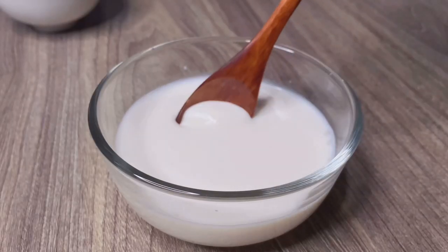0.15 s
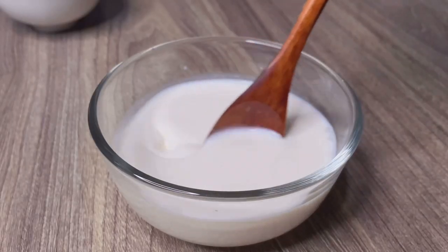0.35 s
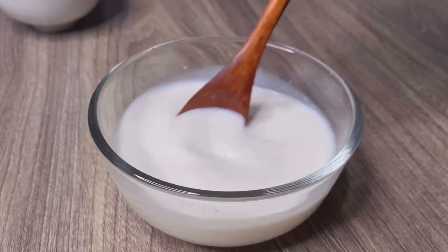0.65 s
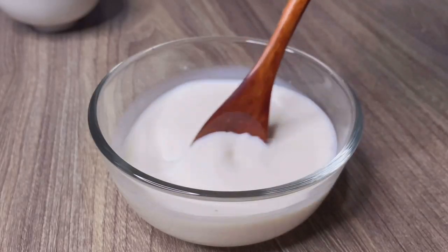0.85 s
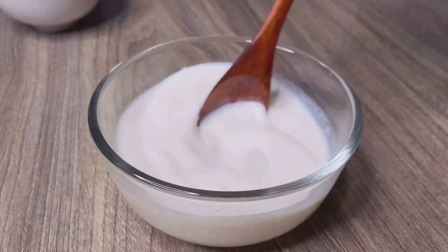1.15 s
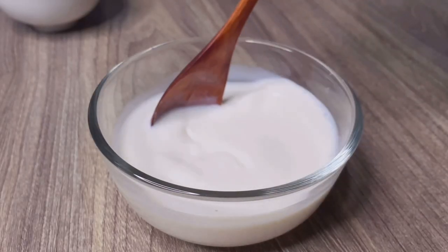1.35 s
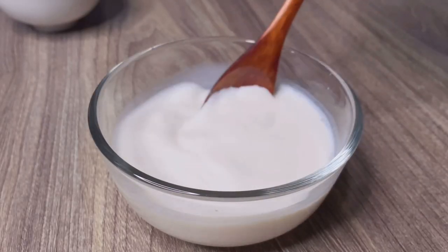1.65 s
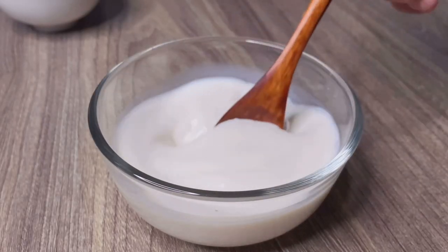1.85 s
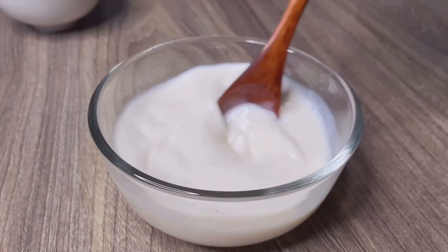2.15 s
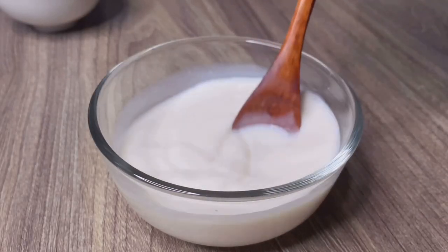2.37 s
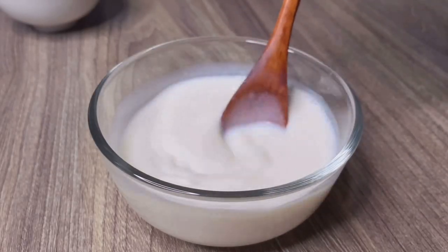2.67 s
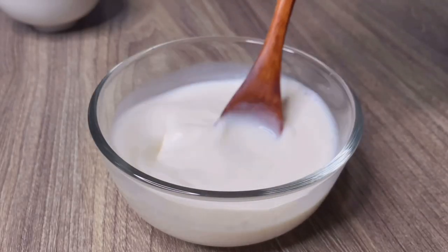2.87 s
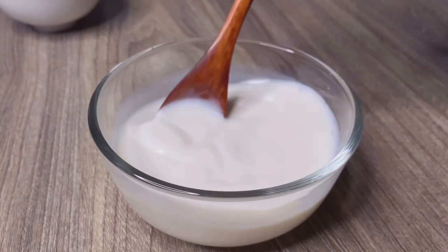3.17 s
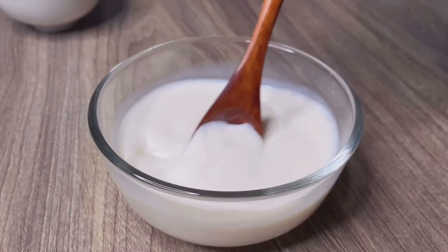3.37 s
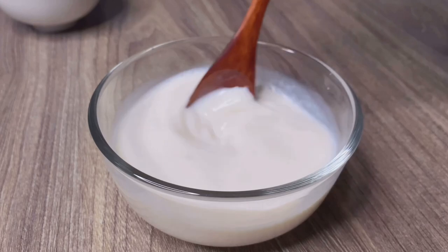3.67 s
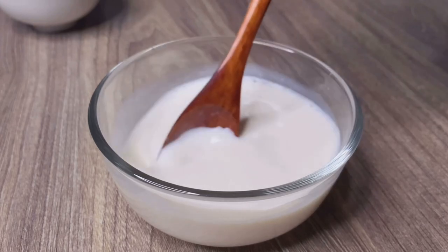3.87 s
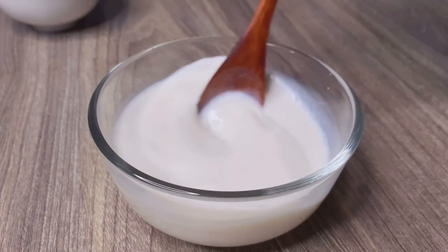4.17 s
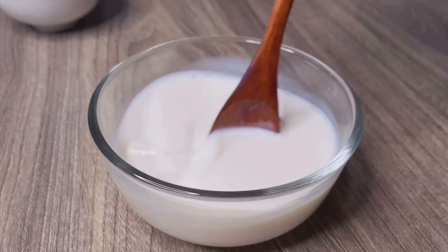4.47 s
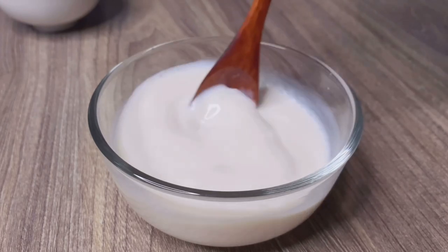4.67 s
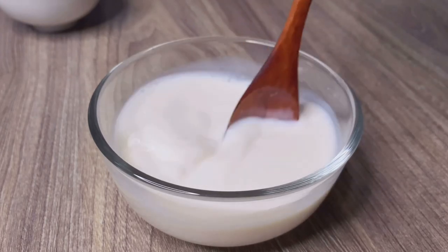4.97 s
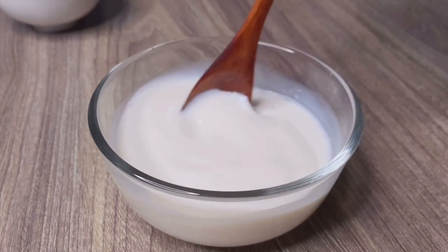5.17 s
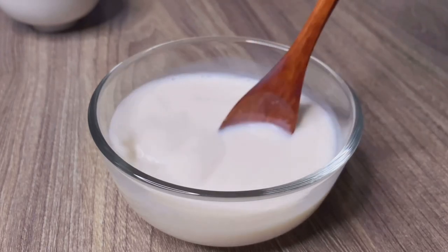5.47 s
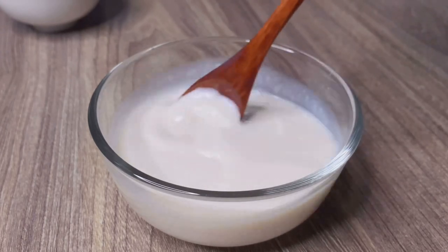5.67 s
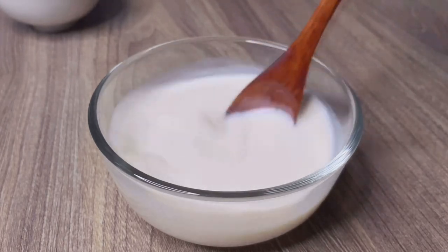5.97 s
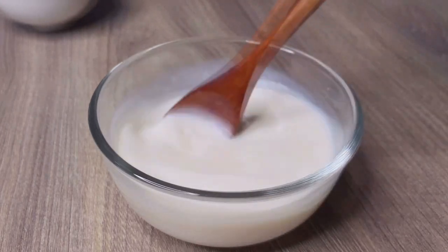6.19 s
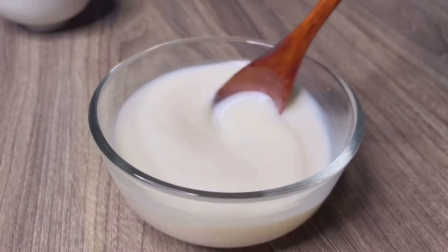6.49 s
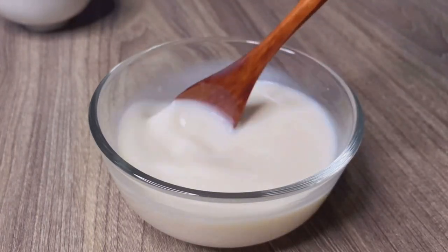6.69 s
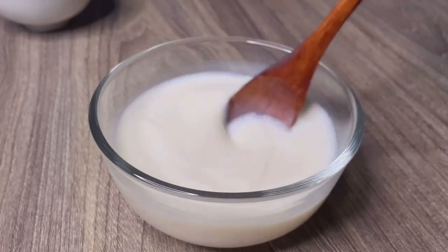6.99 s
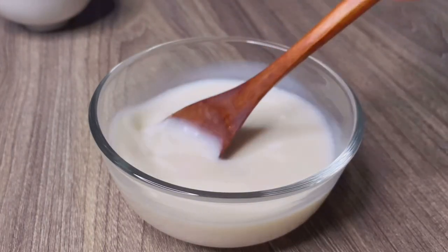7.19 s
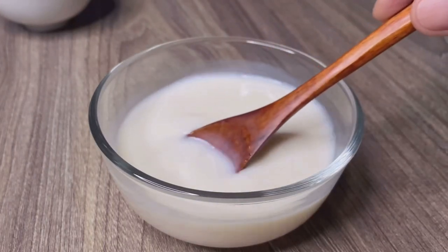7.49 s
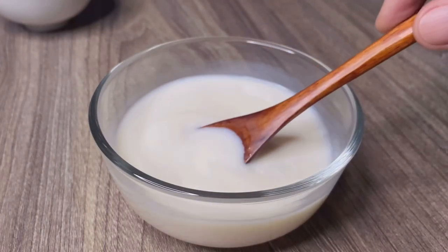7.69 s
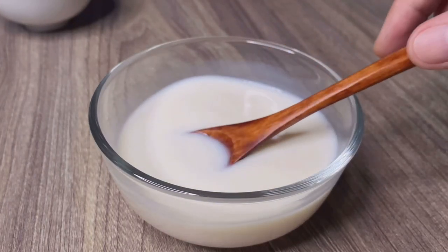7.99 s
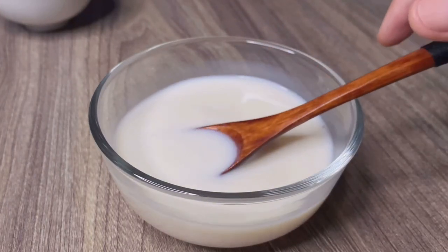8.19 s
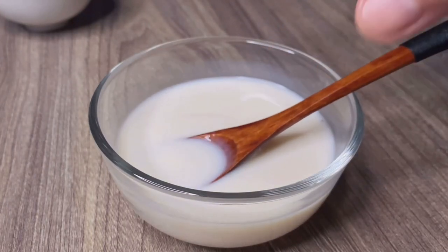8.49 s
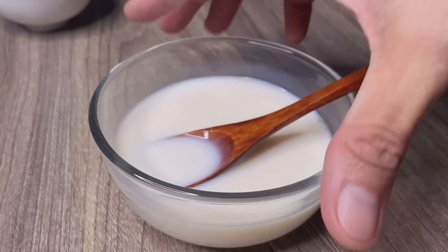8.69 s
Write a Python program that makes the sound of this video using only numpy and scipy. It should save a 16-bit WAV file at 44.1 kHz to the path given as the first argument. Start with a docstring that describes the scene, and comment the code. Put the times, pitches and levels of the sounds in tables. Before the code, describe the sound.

A wooden spoon stirs thick liquid in a glass bowl, scraping, ticking and knocking the wall, then its handle clatters onto the rim.

```python
"""A wooden kitchen table: a wooden spoon stirs a thick liquid in a glass bowl, picked up by two microphone ports.
Its edge scrapes (noise bands and table drone) and ticks (short bursts and notes) along the glass; it bumps the
wall (pushes through table resonances, ringing glass modes), and at last the handle drops on the rim and clatters.
Gurgle blips follow the drone, and a hand brushes the bowl at the end.
Underneath: a resonant room rumble, a pulsing whir, a faint hiss. The left port is a little nearer to the bowl."""
import sys
import numpy as np
from scipy import signal
from scipy.fft import rfft, irfft, next_fast_len
from scipy.io import wavfile
from scipy.ndimage import uniform_filter1d, map_coordinates

SR = 44100
rng = np.random.default_rng(int(sys.argv[2]) if len(sys.argv) > 2 else 0)


def file_out(sig):
    """Save sig as 16-bit WAV at sys.argv[1]."""
    # one column per channel
    cols = np.atleast_2d(sig).T
    # limit, then scale
    lim = np.clip(cols, -1, 1)
    pcm = np.round(lim * 32767).astype(np.int16)
    wavfile.write(sys.argv[1], SR, pcm)


N = 389844
TIME_S = np.arange(N) / SR

# Room levels. Each row: time in seconds, rumble level in dB, whir level in dB.
ROOM_LEVELS = [(0.0, -70, -70.5), (0.47, -71.5, -70.5), (0.83, -62, -74), (2.75, -58, -71),
               (4.33, -53.5, -66.5), (7.7, -54, -67), (8.84, -55.5, -66.5)]
# Rumble resonances. Each row: centre in Hz, width in Hz, relative level in dB.
RUMBLE_MODES = [(50.8, 29, -9.5), (96, 10.9, -0.5), (152.6, 15, -6), (282, 33.5, -14.5), (548, 110, -30)]
# Whir spectrum. Each row: frequency in Hz, relative density in dB per Hz.
WHIR_SPECTRUM = [(1800, -16), (2000, -1.5), (2250, 3), (2450, -0.5), (2600, -38)]
# Room hiss spectrum. Each row: frequency in Hz, relative density in dB per Hz.
HISS_SPECTRUM = [(300, -18.5), (1200, -12.5), (3000, -20), (6500, -22), (11000, -30), (12000, -52)]
# Left-right likeness of the room noise. Each row: frequency in Hz, correlation from 0 to 1.
ROOM_LIKENESS = [(70, 0.88), (130, 0.94), (290, 0.8), (640, 0)]
# Decay of the walls' answer. Each row: frequency in Hz, t60 in seconds.
WALL_T60 = [(200, 0.65), (2000, 0.13), (12000, 0.13)]
# Port difference for sound from the bowl. Each row: frequency in Hz, left lead in radians, left over right in dB.
PORT_DIFFERENCE = [(0, 1, 1), (390, 0.73, -1.5), (990, 2.5, 3.5), (2140, 2, 5), (3590, 4.5, 8.5),
                   (5800, 4.5, 0), (6980, 8.5, 2), (11630, -3.5, -2), (13860, -6, 1.5), (16900, -17, -3.5)]
# Band cancelled by the table's reflection. Each row: centre in Hz, width in Hz, level in dB.
TABLE_DIP = [(2600, 1280, -7.5)]
# Table resonances. Each row: centre in Hz, width in Hz, level in dB.
TABLE_MODES = [(150, 45, 2), (255, 101, 6.5), (380.7, 34.2, 14), (571, 72, -3)]
# Spoon resonances. Each row: centre in Hz, width in Hz, level in dB.
SPOON_MODES = [(3410, 1520, 0.5), (6450, 900, -0.5), (7166, 420, 1.5), (9310, 780, 0), (11010, 1220, -5.5),
               (14670, 1070, -11)]
# Handle resonances. Each row: centre in Hz, width in Hz, level in dB.
CLATTER_MODES = [(207, 34, 4), (384, 120, -7), (575, 75, -1.5), (1380, 187, 0), (3060, 150, -0.5),
                 (4400, 1800, -16), (6800, 4100, -23.5), (9400, 200, -17)]
# Glass modes. Each row: pitch in Hz, undamped t60 in seconds, left lead in radians, left over right in dB.
GLASS_MODES = [(1410, .95, .8, 2.5), (3381, .45, -1.2, -4), (5922, .25, .6, 14)]
# Blows under the liquid, lowest mode. Each row: start in seconds, level in dB, free ringing in seconds.
BLOWS_LOW_MODE = [(0.639, -55, 0.27), (1.0766, -60, 0.08), (2.059, -62, 0.16), (2.24, -63.5, 0.3),
                  (2.9282, -63, 0.18), (3.273, -60.5, 0.11), (3.701, -59, 0.32), (3.8167, -53, 0.18),
                  (4.172, -63, 0.19), (4.96, -58, 0.11), (5.1125, -56.5, 0.26), (5.5448, -61, 0.19),
                  (5.611, -53.5, 0.16), (6.116, -64, 0.47), (6.5073, -48, 0.17), (6.7998, -73, 0.15),
                  (6.993, -49, 0.43), (7.7787, -67.5, 0.14)]
# Touches high on the wall, second mode. Each row: start in seconds, level in dB, free ringing in seconds.
CHIMES_SECOND_MODE = [(.502, -60, .06), (2.002, -59, 0.057), (2.349, -56, .1)]
# Handle on the rim. Each row: start in seconds, then level in dB and free ringing in seconds for each glass mode.
RIM_STRIKES = [(8.042, -36.5, 0.058, -43, 0.082, -51.5, 0.067), (8.061, -43, 0.17, -52, 0.14, -80, .04),
               (8.264, -29, 0.033, -35, 0.31, -38.5, 0.067), (8.298, -61, 0.041, -52.5, 0.28, -74, 0.05)]
# Spoon or hand bumping the bowl. Each row: start in seconds, level in dB, pitch in Hz.
BOWL_BUMPS = [(0.507, -47.5, 382), (0.624, -35.5, 362), (1.04, -38, 347), (1.678, -44.5, 338),
              (1.791, -49, 254), (2.036, -36.5, 296), (2.382, -37.5, 375), (2.448, -40.5, 296),
              (2.563, -40, 382), (2.703, -47.5, 328), (2.779, -45, 391), (2.831, -40.5, 400),
              (3.097, -35.5, 290), (3.189, -36, 376), (3.304, -41, 272), (3.505, -38, 349),
              (3.61, -41.5, 383), (3.686, -38.5, 371), (3.803, -37.5, 375), (3.918, -40.5, 379),
              (4.188, -34.5, 358), (4.208, -39, 387), (4.288, -38, 377), (4.335, -42.5, 381),
              (4.459, -37, 399), (4.543, -39.5, 348), (4.849, -38.5, 384), (4.9, -34.5, 402),
              (4.957, -43, 392), (5.097, -39, 387), (5.31, -35.5, 377.5), (5.621, -35, 372),
              (5.662, -44, 366), (6.002, -38, 378.5), (6.07, -38.5, 351), (6.113, -37.5, 390),
              (6.202, -44, 379), (6.505, -28, 396), (6.987, -25, 372.6), (7.1, -37.5, 266),
              (7.781, -38, 266), (8.045, -42, 212), (8.061, -33, 222), (8.259, -35, 377),
              (8.307, -35.5, 235)]
# Edge catching on the glass. Each row: start in seconds, blade note level in dB, crack level in dB.
EDGE_TICKS = [(0.0909, -29, -41.5), (0.17, -40, -52), (0.501, -46, -45.5), (0.5606, -55, -53),
              (0.618, -25, -32.5), (0.6401, -39, -33.5), (1.0397, -24.5, -44), (1.061, -20, -40),
              (1.4552, -37, -43.5), (1.529, -32.5, -56), (1.6654, -47, -40.5), (1.8607, -58, -53.5),
              (2.001, -29.5, -71), (2.0542, -43, -48.5), (2.3576, -44, -47.5), (2.4568, -48, -53),
              (2.4997, -32.5, -55), (2.927, -31.5, -52), (3.0485, -38, -50), (3.0818, -41, -41),
              (3.268, -49, -42.5), (3.3057, -69, -47), (3.5011, -38, -51.5), (3.6792, -19, -43),
              (3.695, -20, -44), (3.7082, -41, -38.5), (3.796, -45, -39), (3.8098, -54, -38),
              (3.9343, -24.5, -47), (4.009, -24.5, -45), (4.0535, -41, -48.5), (4.153, -28.5, -46),
              (4.1945, -20, -37), (4.2286, -24.5, -51), (4.288, -30, -42.5), (4.3257, -33, -42),
              (4.3947, -34, -49.5), (4.513, -29, -48), (4.6663, -29.5, -49), (4.878, -33.5, -56),
              (4.9, -21.5, -41.5), (4.918, -17, -35.5), (5.094, -14.5, -32.5), (5.1555, -26, -39.5),
              (5.497, -24.5, -46), (5.543, -26.5, -48), (5.6036, -22, -32.5), (5.6142, -22, -37),
              (5.63, -43, -30.5), (5.7359, -55, -38), (5.853, -27, -59), (5.8734, -24, -47.5),
              (5.9256, -47, -41.5), (6.0007, -32, -46.5), (6.0367, -40, -43.5), (6.0662, -20.5, -44.5),
              (6.136, -51, -47), (6.2045, -45, -54), (6.324, -24, -45.5), (6.5023, -28, -58),
              (6.5569, -24, -42.5), (6.7789, -62, -52), (6.984, -24, -45.5), (7.0403, -27.5, -42.5),
              (7.1135, -43, -49.5)]
# Spoon pressing on the glass. Each row: start in seconds, hold in seconds, blade note in Hz,
# rasp level in dB, wet hiss level in dB, table drone level in dB.
SCRAPE_STROKES = [(0.049, 0.094, 3830, -68, -56.5, -64), (0.431, 0.14, 3680, -67, -63, -64.5),
                  (0.615, 0.041, 3800, -64, -51.5, -49.5), (1.033, 0.044, 3920, -55, -62, -57),
                  (1.221, 0.1, 4020, -55, -63, -74), (1.44, 0.083, 4086, -58, -61.5, -59.5),
                  (1.649, 0.021, 3784, -61, -68, -73), (2.001, 0.04, 3655, -63, -59.5, -57.5),
                  (2.345, 0.13, 3500, -81, -68.5, -54.5), (2.791, 0.096, 3700, -63, -68, -52.5),
                  (3.056, 0.035, 3870, -51, -53, -50.5), (3.674, 0.045, 3930, -58, -65, -52),
                  (3.795, 0.037, 3800, -74, -53, -49), (3.92, 0.083, 3685, -54.5, -63, -50),
                  (4.151, 0.097, 3870, -55, -53.5, -49.5), (4.4, 0.12, 3710, -58.5, -65.5, -55.5),
                  (4.621, 0.18, 3933, -63, -58, -58.5), (4.872, 0.11, 3807, -50, -53, -48),
                  (5.091, 0.09, 3934, -50.5, -52.5, -52), (5.482, 0.069, 3750, -62, -53.5, -56),
                  (5.601, 0.05, 3690, -72, -52, -48.5), (5.78, 0.14, 3820, -57, -58.5, -52),
                  (5.998, 0.11, 3703, -71, -59, -58.5), (6.301, 0.015, 3830, -58, -65, -66),
                  (6.502, 0.13, 3696, -61, -65, -55.5), (6.982, 0.11, 3754, -60.5, -61, -50.5),
                  (7.219, 0.022, 3550, -67, -92, -58)]
# Fade after a scrape: rasp, wet hiss and drone in dB per second.
RELEASE_DB_PER_S = [182, 117, 128]
# Light contact between scrapes. Each row: time in seconds, base level in dB.
GLIDE_BASE = [(0, -72), (2.7, -68), (3.9, -65), (6.1, -63.5), (6.45, -81), (7.2, -102)]
# Rasp, wet hiss and drone over the glide's base level, in dB.
GLIDE_OFFSET_DB = [-3, 4, 1.5]

TOP_HZ = 16500
GRIP_S, GRIP_DB, GRIP_HZ = 8.815, -47.5, 895
GRAB_DB_PER_S = 703  # onset slope of scrapes and grip
CRACK_DRIVE_DB, PUSH_DRIVE_DB = 24, 6  # added ahead of the spoon and table resonances
SOFT_DB, BRIGHTER_DB_PER_DB = -41, 0.7  # above SOFT_DB a bump's knock gains this much extra
GURGLES_PER_S, GURGLE_HZ, GURGLE_DB = 70, 949.5, -10  # rate, middle pitch, level over the drone


def amp(db):
    """dB to amplitude."""
    return 10 ** (np.asarray(db) / 20)


def unit(x):
    """Scales to rms 1."""
    return x / np.sqrt(np.mean(x ** 2) + 1e-20)


def along(points, hz):
    """Interpolates (Hz, value) points on a log axis."""
    f, v = np.transpose(points)
    return np.interp(np.log(hz + 1), np.log(f + 1), v)


def shape(points):
    """A gain by frequency, shut well outside its points."""
    def gain(hz):
        inside = (hz > .7 * points[0][0]) * (hz < 1.1 * points[-1][0])
        return amp(along(points, hz)) * inside
    return gain


def curves(rows):
    """One value per sample per column; -120 dB past a last row over 1 s before the end."""
    s, *cols = np.transpose(rows)
    after_db = -120 if s[-1] < TIME_S[-1] - 1 else None
    return [np.interp(TIME_S, s, c, right=after_db) for c in cols]


def wobble(knots_per_s):
    """A smooth random curve."""
    knots = rng.standard_normal(int(N * knots_per_s / SR) + 4)
    return map_coordinates(knots, [TIME_S * knots_per_s])


def filtered(x, response):
    """x times a complex response of frequency."""
    m = next_fast_len(N + SR // 2)
    return irfft(rfft(x, m) * response(np.fft.rfftfreq(m, 1 / SR)), m)[..., :N]


def body(modes):
    """The causal response of a set of resonances, alternating in sign."""
    def response(f):
        return sum((-1) ** k * amp(db) * 1j * f * w / (c * c - f * f + 1j * f * w)
                   for k, (c, w, db) in enumerate(modes))
    return response


def add(track, s, sound):
    """Lays a short sound on the track at s seconds."""
    part = track[max(round(s * SR), 0):][:len(sound)]
    part += sound[:len(part)]


def ring(t, hz, t60_s, attack_s):
    """A dying sine with a soft start."""
    return np.sin(2 * np.pi * hz * t) * amp(-60 * t / t60_s) * (1 - np.exp(-t / attack_s))


def patchy(x, depth_db):
    """Random gain in patches of time and frequency."""
    z = signal.stft(x, nperseg=256)[2]
    field = uniform_filter1d(rng.standard_normal(z.shape), size=6, axis=0)
    field = uniform_filter1d(field, size=5, axis=1)
    return signal.istft(z * amp(depth_db * unit(field)), nperseg=256)[1][:N]


def diffuse(response):
    """Stereo noise of rms 1; mid and side shares set the left-right likeness by frequency."""
    def mid_side(hz):
        turn = np.arccos(np.clip(along(ROOM_LIKENESS, hz), -1, 1)) / 2
        return response(hz) * [np.cos(turn), np.sin(turn)]
    mid, side = filtered(rng.standard_normal((2, N)), mid_side)
    return unit(np.array([mid + side, mid - side]))


def room_tone():
    """A low rumble in the room's resonances, a whir that pulses fast, a faint hiss."""
    rumble_db, whir_db = curves(ROOM_LEVELS)
    swell = amp(1.5 * wobble(7))
    rumble = swell * diffuse(
        lambda f: body(RUMBLE_MODES)(f) / (1 + (35 / (f + 1)) ** 4) / (1 + (f / 900) ** 4))
    rumble = amp(rumble_db) * rumble * amp([[-1.1], [1.1]])  # right port stronger
    whir = amp(whir_db) * unit(amp(2.0 * wobble(90)) * diffuse(shape(WHIR_SPECTRUM)))
    hiss = amp(whir_db - 7.0) * diffuse(shape(HISS_SPECTRUM))
    return rumble + whir + hiss


def kitchen(x):
    """The walls' answer: delayed noise whose frequencies die at their own speeds."""
    hz, t, z = signal.stft(rng.standard_normal((2, SR // 3)), SR, nperseg=256)
    decay = amp(-60 * t / along(WALL_T60, hz)[:, None])
    tail = signal.istft(z * decay, SR, nperseg=256)[1]
    delayed = np.pad(x, (150, 0))[None]  # samples
    return signal.fftconvolve(delayed, tail / np.linalg.norm(tail[0]), axes=1)[:, :N]


def ports(x, lead_rad, left_db):
    """Phase and level differences by frequency, half on each side."""
    def response(hz):
        half = np.exp(.5j * lead_rad(hz)) * amp(left_db(hz) / 2)
        return np.array([half, 1 / half])
    return filtered(np.array([x, x]), response)


def shifting(pair, radians):
    """The circling spoon's path to each port keeps changing: slow random phase, less in the bass."""
    hz, _, z = signal.stft(pair, SR, nperseg=256)
    field = uniform_filter1d(rng.standard_normal(z.shape), size=8, axis=1)
    field = uniform_filter1d(field, size=60, axis=2)
    turn = radians * unit(field) * (hz / (hz + 500))[:, None]
    return signal.istft(z * np.exp(1j * turn), nperseg=256)[1][:, :N]


def grip():
    """Skin on glass as the hand takes hold: a dull noise brush that swells in."""
    skin = body([(GRIP_HZ / 2, GRIP_HZ, 0)])
    brush = unit(filtered(rng.standard_normal(N), lambda f: skin(f) / (1 + 1j * f / GRIP_HZ) ** 2))
    return amp(GRIP_DB + GRAB_DB_PER_S * np.minimum(TIME_S - GRIP_S, 0)) * brush


def clatter():
    """The wooden handle cracks and rattles on: noise with a short and a long decay, through its resonances."""
    shake, t = np.zeros(N), np.arange(SR // 2) / SR
    decay = amp(-60 * t / 0.014) + 0.19 * amp(-60 * t / 0.34)
    for s, _, _, second_mode_db, *_ in RIM_STRIKES:
        add(shake, s, amp(second_mode_db + 26) * rng.standard_normal(len(t)) * decay)
    rattle = shake * amp(2.0 * wobble(200))
    return filtered(rattle, lambda f: body(CLATTER_MODES)(f) / (1 + 1j * f / 7000) ** 2)


def muffled(t, db, free_s):
    """Gain of a glass mode: a new touch takes 14 dB off around free_s."""
    return amp(db - 14 / (1 + np.exp((free_s - t) / 0.004)))


def glass():
    """Bowl modes as dying sines, one track each: blows, chimes, handle strikes and rubbing drive them."""
    modes, t = np.zeros((len(GLASS_MODES), N)), np.arange(SR // 2) / SR
    tones = [ring(t, hz, t60_s, 0.0028) for hz, t60_s, _, _ in GLASS_MODES]
    for s, db, free_s in BLOWS_LOW_MODE:
        add(modes[0], s, muffled(t, db, free_s) * tones[0] * (1 - np.exp(-t / 0.0057)))
    for s, db, free_s in CHIMES_SECOND_MODE:
        add(modes[1], s, muffled(t, db, free_s) * tones[1])
    for s, *struck in RIM_STRIKES:
        for track, tone, db, free_s in zip(modes, tones, struck[::2], struck[1::2]):
            add(track, s, muffled(t, db - 80 * t, free_s) * tone)  # the resting handle drains the ring
    drone_level = contact()[-1]
    rubbing = amp(13.0) * drone_level * rng.standard_normal(N)  # keeps two modes humming
    modes[0] += filtered(rubbing, body([(GLASS_MODES[0][0], 14, -1)]))
    modes[1] += filtered(rubbing, body([(GLASS_MODES[1][0], 8, -3)]))
    waver_db = 3 * np.array([wobble(25) for _ in GLASS_MODES])  # moving liquid
    return modes * amp(waver_db)


def bumps():
    """A short note plus a noise push through the table; the wood knocks higher up, more so when hit hard."""
    pushes, knocks, notes, t = np.zeros(N), np.zeros(N), np.zeros(N), np.arange(SR // 5) / SR
    for s, db, hz in BOWL_BUMPS:
        push = amp(db + PUSH_DRIVE_DB) * rng.standard_normal(len(t)) * amp(-60 * t / 0.082)
        add(notes, s, amp(db) * ring(t, hz, 0.11, 0.0026))
        add(pushes, s, push)
        add(knocks, s, push * amp(BRIGHTER_DB_PER_DB * max(db - SOFT_DB, 0)))
    wood = body([(954, 420, -9.5), (2015, 77, -9.5)])  # Hz, width Hz, dB
    table = filtered(pushes, lambda f: body(TABLE_MODES)(f) / (1 + 1j * f / 1500))
    knock = filtered(knocks, lambda f: wood(f) / (1 + 1j * f / 2500) ** 2)
    return notes + table + knock


def contact():
    """Blade note, then rasp, hiss and drone levels: each scrape grabs, holds and lets go over a light glide."""
    glide_db, = curves(GLIDE_BASE)
    power = amp(2 * (glide_db + np.c_[GLIDE_OFFSET_DB]))
    t = np.arange(-SR // 10, SR // 2) / SR
    for s, held_s, _, *levels_db in SCRAPE_STROKES:
        keep = s + t >= 0
        for track, db, release in zip(power, levels_db, RELEASE_DB_PER_S):
            shape_db = GRAB_DB_PER_S * np.minimum(t, 0) - release * np.maximum(t - held_s, 0)
            add(track, s + t[keep][0], amp(2 * (db + shape_db[keep])))
    starts_s, _, notes_hz, *_ = np.transpose(SCRAPE_STROKES)
    return np.interp(TIME_S, starts_s, notes_hz), *np.sqrt(power)


def ticks():
    """Each catch is a burst of a few ms through the spoon, plus the blade's short note."""
    sharp, notes, t = np.zeros(N), np.zeros(N), np.arange(SR // 50) / SR
    note_hz = contact()[0]
    for s, note_db, crack_db in EDGE_TICKS:
        burst = np.sign(rng.standard_normal(len(t))) * amp(-60 * t / 0.0075) * (1 - np.exp(-t / 0.00086))
        add(sharp, s, amp(crack_db + CRACK_DRIVE_DB) * burst)
        add(notes, s, amp(note_db) * ring(t, note_hz[round(s * SR)], 0.011, 0.0007))
    return patchy(filtered(sharp, body(SPOON_MODES)), depth_db=2.5) + notes


def gurgles():
    """Small air pockets in the liquid: soft short blips of scattered time, pitch and size."""
    blips, t = np.zeros(N), np.arange(SR // 20) / SR
    for when, pitch, size in rng.random((int(GURGLES_PER_S * N / SR), 3)):
        hz = GURGLE_HZ * np.exp(.45 * (pitch - .5))
        add(blips, when * N / SR, amp(18.0 * size) * ring(t, hz, 0.026, 0.0033))
    return amp(GURGLE_DB) * unit(blips)


def drag():
    """Friction: grains at the blade's note, a scratchy wet hiss, a judder in the table with gurgles."""
    rasp_hz, rasp_level, hiss_level, drone_level = contact()
    clumps = wobble(20)  # the stroke grips and lets go
    grit = amp(2 * clumps + 4 * wobble(60) + 4 * wobble(330)) * rng.standard_normal((2, N))
    slow = filtered(grit, lambda f: 1 / (1 + 1j * f / 330) ** 2)
    phase = 2 * np.pi * np.cumsum(rasp_hz * (1 + 0.04 * wobble(15))) / SR
    rasp = unit(slow[0] * np.cos(phase) + slow[1] * np.sin(phase))  # noise band following the note
    scratch = amp(2 * clumps + 2 * wobble(70) + 4 * wobble(400)) * rng.standard_normal(N)
    hiss = unit(patchy(filtered(scratch, body(SPOON_MODES)), depth_db=3.0))
    judder = amp(4 * wobble(30)) * rng.standard_normal(N)
    drone = unit(filtered(judder, lambda f: body(TABLE_MODES)(f) / (1 + 1j * f / 1500)))
    return rasp_level * rasp + hiss_level * hiss + drone_level * (drone + gurgles())


def scene():
    """The bowl at the two ports, the walls' answer and the room."""
    edge = filtered(drag() + ticks(), lambda hz: 1 - body(TABLE_DIP)(hz))
    spoon = edge + bumps() + clatter() + grip()
    modes = glass()
    f, lead_rad, left_db = np.transpose(PORT_DIFFERENCE)
    near = ports(spoon, lambda hz: np.interp(hz, f, lead_rad), lambda hz: np.interp(hz, f, left_db))
    near = shifting(near, radians=.45)
    for track, (_, _, turn, side_db) in zip(modes, GLASS_MODES):
        near = near + ports(track, lambda hz: np.full_like(hz, turn), lambda hz: np.full_like(hz, side_db))
    to_walls = spoon + amp(-22.0) * modes.sum(axis=0)  # glass tones: mostly direct, little wall answer
    walls = amp(-6) * kitchen(to_walls)
    walls = filtered(walls, lambda hz: 1 / (1 + (800 / (hz + 1)) ** 2))  # the table's low notes stay close
    return near + walls + room_tone()


def record(dry):
    """The recorder keeps nothing above its band limit."""
    return filtered(dry, lambda hz: hz < TOP_HZ)


dry = scene()
out = record(dry)
file_out(out)
```